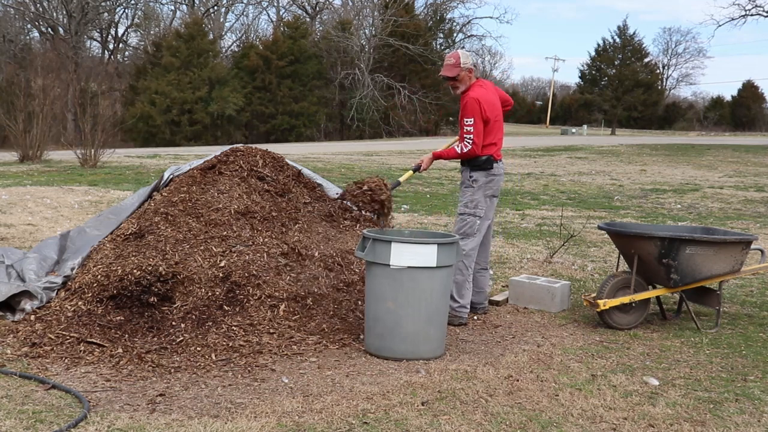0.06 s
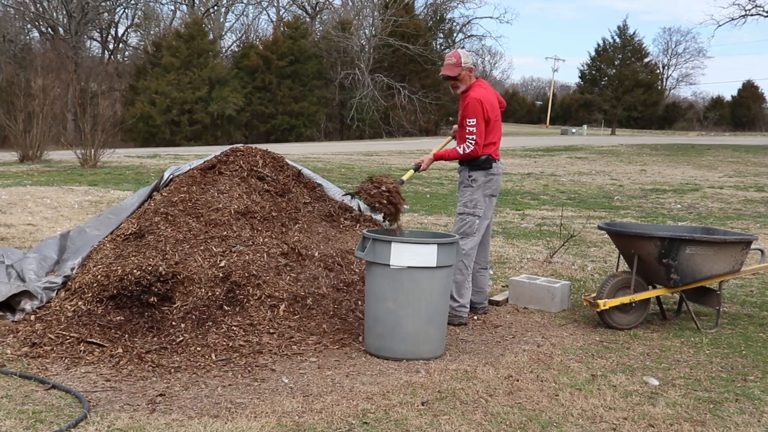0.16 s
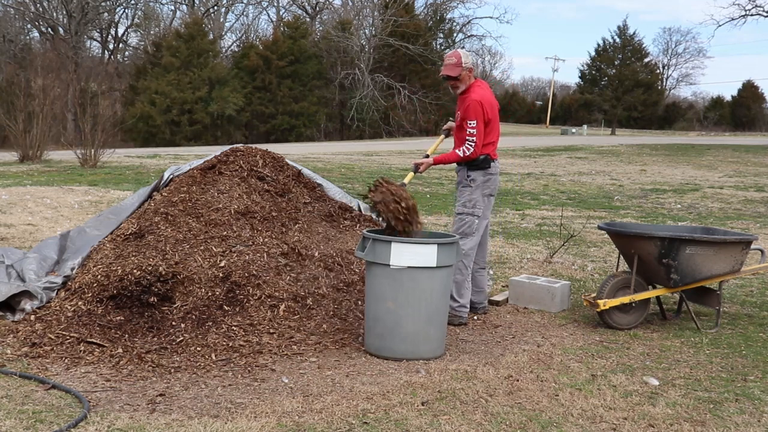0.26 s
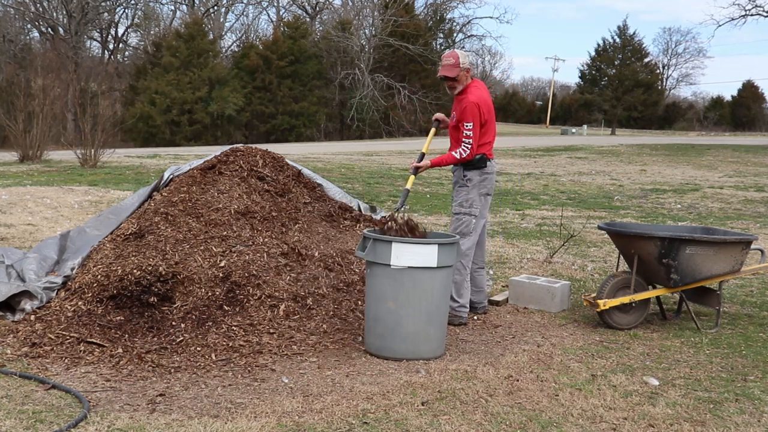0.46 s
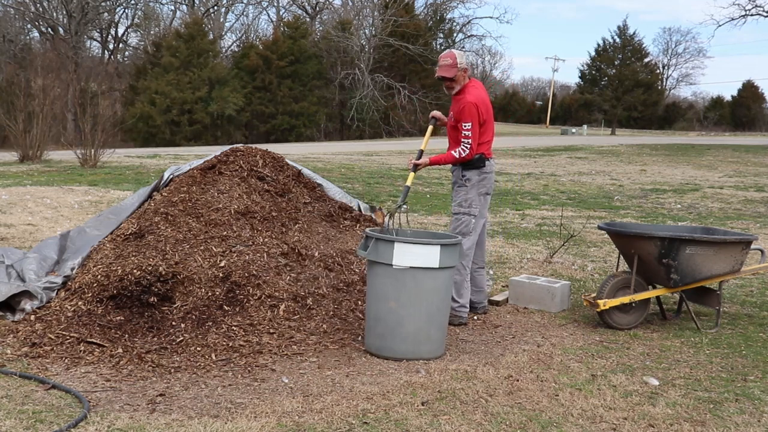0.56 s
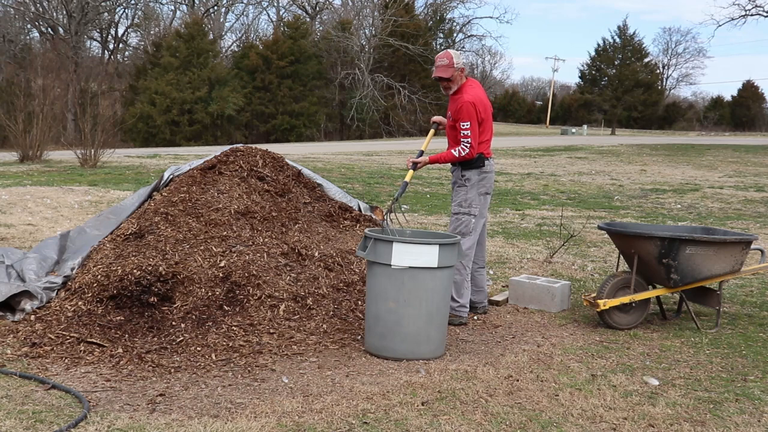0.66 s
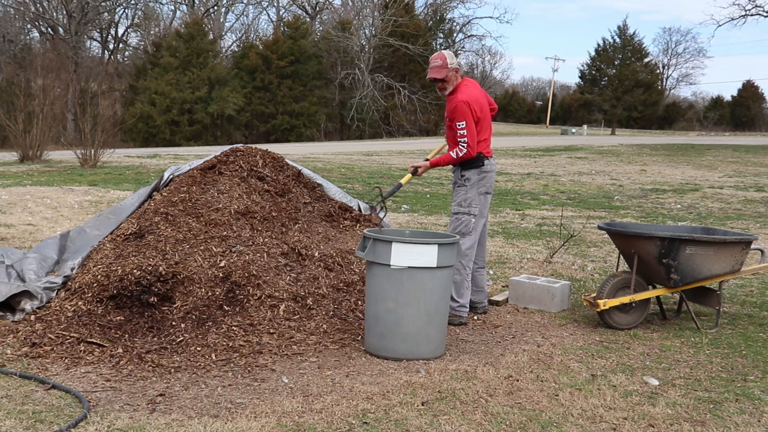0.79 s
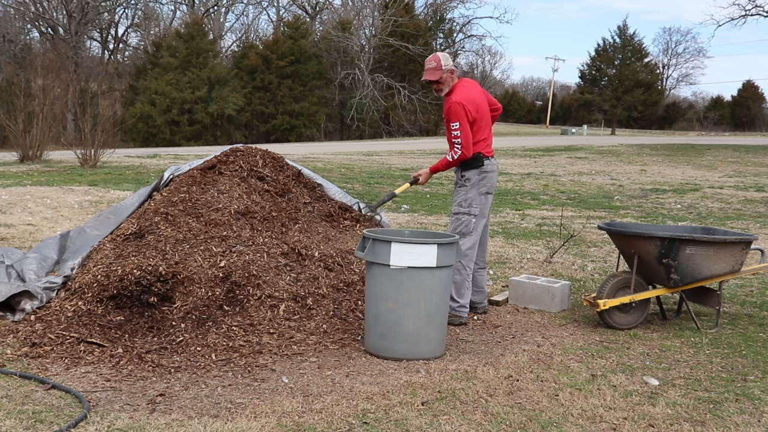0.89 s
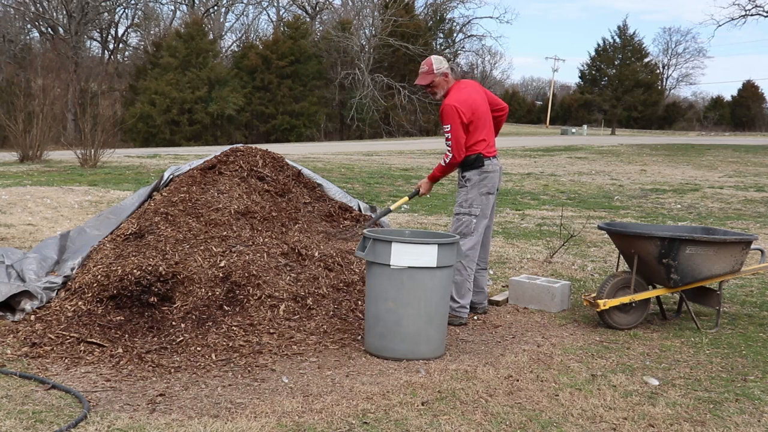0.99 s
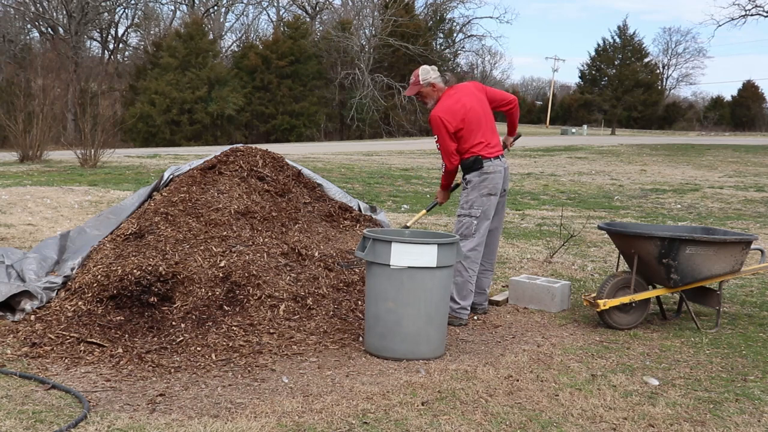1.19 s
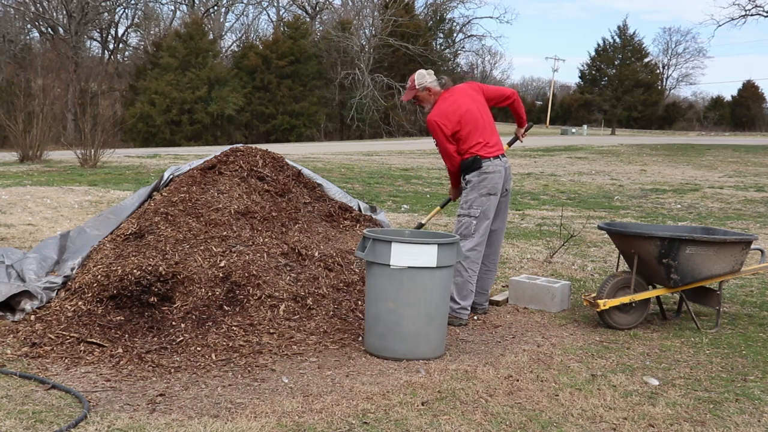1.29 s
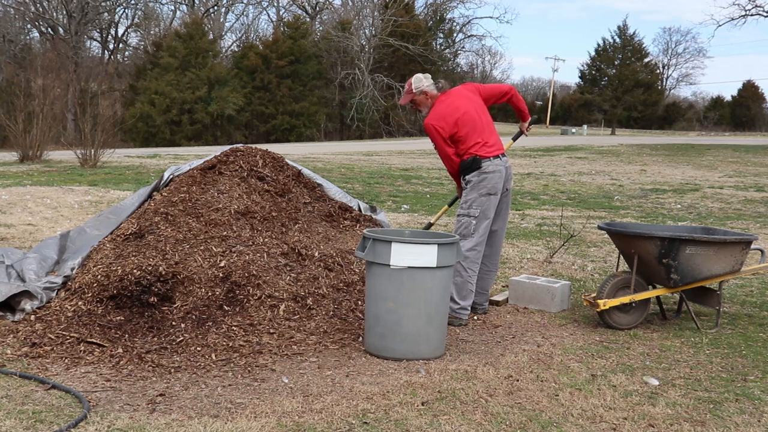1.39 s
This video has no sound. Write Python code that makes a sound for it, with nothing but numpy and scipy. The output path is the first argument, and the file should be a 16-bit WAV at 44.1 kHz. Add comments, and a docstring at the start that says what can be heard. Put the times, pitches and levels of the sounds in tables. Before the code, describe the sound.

Close up in the open air, a shovelful of wood chips trickles, then rushes into a large plastic bin that booms softly. A knock on the rim and last ticks follow, over light microphone wind, distant traffic and one far bird.

```python
"""A shovelful of wood chips slides off the blade and pours into a big plastic bin, close by, outdoors.
The chips patter and crackle in thousands of tiny impacts, clumps knock on the wall and the load booms
on the bottom. The blade clinks, the shovel bumps the rim and a few stragglers drop.
Behind it are one far bird call, distant traffic and light wind on the microphone."""
import sys
import numpy as np
from scipy import signal
from scipy.fft import rfft, irfft, next_fast_len
from scipy.io import wavfile
from scipy.ndimage import uniform_filter1d, map_coordinates

SR = 44100
rng = np.random.default_rng(int(sys.argv[2]) if len(sys.argv) > 2 else 0)


def master(y):
    """Save y as 16-bit WAV."""
    cut = np.clip(np.atleast_2d(y).T, -1, 1)
    pcm = np.round(cut * 32767)  # scale
    wavfile.write(sys.argv[1], SR, pcm.astype(np.int16))


N = 63945

# The tone of a hard, woody snap. Each row: frequency in Hz, level in dB.
SNAP_SPECTRUM = [(600, -27), (1300, 6), (3400, 0), (4000, -13.5), (5200, -12.5), (6500, -28), (9000, -33),
                 (15500, -45)]
# The tone of splinters and fine ticking. Each row: frequency in Hz, level in dB.
CRISP_SPECTRUM = [(800, -7), (2500, 2), (5000, -4), (8000, -13.5), (12000, -12), (15500, -18)]


def chip_stream():
    """Chips patter dully on the plastic, crackle against each other and hiss along the blade."""
    # The course of the pour. Each row: time in seconds, patter level in dB, crackle level in dB.
    pour_levels = [(.165, -47, -54.5), (.2, -31.5, -37), (.265, -31, -35.5), (.31, -42, -50.5),
                   (.39, -46, -49), (.44, -33, -45), (.5, -43, -38.5), (.528, -27, -36.5),
                   (.542, -24, -22.5), (.56, -24, -26), (.58, -28, -26.5), (.62, -24.5, -31.5),
                   (.68, -22.5, -29), (.715, -25.5, -35), (.76, -27, -33.5), (.8, -32, -41.5),
                   (.865, -34.5, -46), (.905, -52, -48.5), (.93, -23, -46.5), (.98, -39, -48.5),
                   (1.03, -47.5, -57), (1.16, -46, -61.5), (1.25, -58.5, -80)]
    # Fine chips sliding off the blade. Each row: time in seconds, level in dB.
    slide_levels = [(0, -62), (.17, -57.5), (.24, -53.5), (.31, -67), (.53, -56), (.539, -45.5), (.65, -44),
                    (.71, -53), (.8, -56), (.86, -76), (1.2, -85)]
    # Wood on plastic. Each row: frequency in Hz, level in dB.
    patter_spectrum = [(120, -58), (250, -9.5), (400, -8), (560, -1.5), (750, 0.5), (950, -3), (1100, -7.5),
                       (1500, -34.5), (2500, -37)]
    # Wood on wood. Each row: frequency in Hz, level in dB.
    crackle_spectrum = [(700, -36), (1250, 4), (1800, 1), (2300, -0.5), (3400, -2), (3900, -7.5),
                        (5000, -10.5), (6500, -23.5), (9000, -33), (15500, -54)]
    # Wood along steel. Each row: frequency in Hz, level in dB.
    hiss_spectrum = [(2000, -12), (5000, 9.5), (7000, -2), (10000, 0), (13000, -6), (15500, -10)]
    patter_db, crackle_db = curves(pour_levels)
    hiss_db, = curves(slide_levels)
    patter = grains(per_s=2200, low_hz=232, high_hz=1856, cycles=7.9, spread_db=2, samples=1200)
    crackle = grains(per_s=5000, low_hz=1050, high_hz=13700, cycles=8, spread_db=3.5, samples=400)
    hiss = grains(per_s=5000, low_hz=2000, high_hz=15500, cycles=8, spread_db=2.2, samples=200)
    return (amp(patter_db) * coloured(patter, patter_spectrum)
            + amp(crackle_db) * coloured(crackle, crackle_spectrum)
            + amp(hiss_db) * coloured(hiss, hiss_spectrum))


def clump_knocks():
    """Clumps hit the plastic wall, each with a short hollow ring over a dull thud."""
    # Each row: start in seconds, ring level in dB, pitch in Hz, ring T60 in seconds, thud level in dB.
    knocks = [(.194, -24, 870, 0.1, -19), (.2215, -15, 860, 0.018, -43), (.268, -19.5, 738, 0.035, -35),
              (.285, -18.5, 784, .02, -28.5), (.3415, -27, 710, 0.04, -22.5), (.412, -25, 480, 0.05, -29),
              (.457, -16, 874, 0.036, -21.5), (.5065, -10, 790, 0.022, -16), (.5085, 0, 960, 0.015, -12),
              (.512, -6, 1050, 0.012, -16), (.514, -15, 544, 0.055, -26), (.5405, -4.5, 919, 0.052, -13),
              (.5655, -.5, 880, 0.034, -17), (0.577, -7, 720, 0.024, -11), (.584, -12, 820, .02, -22),
              (.672, -17, 710, 0.029, -19), (.678, -18, 750, 0.025, -18), (.722, -13, 717, 0.02, -11),
              (.746, -9.5, 996, 0.046, -13), (.880, -27, 940, 0.055, -22), (.917, -6.5, 700, 0.013, -24),
              (.9235, -21, 570, 0.04, -20), (.932, -18, 440, 0.032, -21), (.9945, -18.5, 762, 0.03, -24.5),
              (1.088, -31.5, 750, 0.048, -33), (1.133, -7.5, 775, 0.024, -23),
              (1.146, -27.5, 570, 0.028, -54)]
    # The thud of the wall. Each row: frequency in Hz, level in dB.
    thud_spectrum = [(80, -35), (180, -13.5), (320, -3.5), (450, -4.5), (750, 2.5), (1050, -5.5),
                     (1400, -7), (2200, -21), (5000, -40.5), (10000, -94)]
    attack_s, overtone_ratio, overtone_db = 0.0014, 2.3, -11.5
    out, thud_noise = np.zeros(N), noise(thud_spectrum)
    for start, ring_db, hz, t60, thud_db in knocks:
        overtone = amp(overtone_db) * ring(hz * overtone_ratio, t60 / 2, attack_s)
        tone = ring(hz, t60, attack_s) + overtone
        thud = np.roll(thud_noise, -int(start * SR)) * fade(t60=0.025, attack_s=attack_s)
        add(out, start, amp(ring_db) * tone + amp(thud_db) * thud)
    return out


def chip_clicks():
    """A hard chip snaps and rings briefly; the higher its pitch, the thinner its snap."""
    # Single chips landing. Each row: start in seconds, level in dB, pitch in Hz, T60 in seconds.
    clicks = [(0.182, -27.5, 1780, 0.018), (0.194, -20.5, 1950, 0.018), (.342, -24.5, 1650, 0.011),
              (0.4115, -23, 2700, 0.024), (.431, -23, 2460, 0.018), (.457, -19, 2845, 0.021),
              (0.502, -18, 2560, 0.009), (0.54, -18, 2300, 0.013), (0.578, -15, 2400, 0.016),
              (.66, -20, 2600, .012), (.6705, -15, 1670, 0.013), (.679, -14, 1830, 0.024),
              (.681, -15.5, 3050, .012), (.7212, -14.5, 3000, 0.012), (.7232, -8.5, 1900, .011),
              (.7455, -16, 2100, .009), (0.7503, -16, 3210, 0.012), (.7538, -9, 2700, 0.009),
              (.765, -16, 2970, 0.011), (0.7728, -15, 2800, 0.0085), (.880, -26, 2920, 0.014),
              (0.916, -28, 2700, 0.035), (0.962, -17, 3070, 0.006), (.975, -23, 3000, 0.0037),
              (.984, -25.5, 2330, 0.0058), (0.9942, -26.5, 3100, 0.0088), (1.0765, -26.5, 3450, .011),
              (1.132, -32, 1910, 0.022)]
    snap_db, ring_db = -2.5, -9
    out, wood = np.zeros(N), noise(SNAP_SPECTRUM)
    for start, db, hz, t60 in clicks:
        snap = unit(high_pass(np.roll(wood, -int(start * SR)), 0.67 * hz, order=3))
        tone = np.sin(2 * np.pi * hz * clock())
        click = (amp(ring_db) * tone + amp(snap_db) * snap) * fade(t60, attack_s=0.0003)
        add(out, start, amp(db) * click)
    return out


def splinters():
    """Thin splinters snap crisply as the load shifts on the blade."""
    # Each row: start in seconds, level in dB.
    snaps = [(.020, -36.5), (0.068, -35.5), (.113, -38), (.139, -34), (0.16, -38), (0.233, -29.5),
             (.257, -31.5), (0.355, -38), (.502, -33), (.537, -30), (0.7205, -35), (0.9621, -44)]
    envelope = np.zeros(N)
    for start, db in snaps:
        add(envelope, start, amp(db) * fade(t60=0.015, attack_s=0.0003))
    return envelope * noise(CRISP_SPECTRUM)


def bin_boom():
    """The bin booms like a drum under each mass of chips and under the shovel's bump, and hums under the steady
    pour."""
    # The bin's low modes. Each row: frequency in Hz, level in dB, T60 in seconds.
    bin_modes = [(108.3, 0.5, 0.19), (130.4, -2, 0.12), (198, -4.5, 0.13), (286, -1, 0.064),
                 (352, -7.5, 0.094)]
    # Blows on the bin: masses of chips landing, and at 0.813 s the shovel's bump on the rim. Each row: start in
    # seconds, level in dB, pitch driven hardest in Hz.
    thumps = [(0.506, -13.5, 284), (.565, -19, 270), (.585, -22, 112), (.6625, -11.5, 107),
              (0.672, -7, 287), (0.729, -12, 134), (0.813, -23, 122), (.918, -17.5, 200)]
    # The hum of the bin. Each row: frequency in Hz, level in dB.
    hum_spectrum = [(70, -29.5), (95, -12), (112, 0), (150, -14), (290, -11.5), (420, -24), (1000, -60)]
    loss_db_per_octave, hum_db = 24, -29.5
    booms = np.zeros(N)
    for start, thump_db, centre_hz in thumps:
        driven_modes = [(hz, thump_db + db - loss_db_per_octave * abs(np.log2(hz / centre_hz)), t60)
                        for hz, db, t60 in bin_modes]
        add(booms, start, struck(driven_modes, attack_s=0.0014))
    pour = np.interp(clock(), [0.475, 0.58, 0.76, 0.865], [0, 1, 1, 0])
    hum = amp(hum_db) * pour * noise(hum_spectrum)
    return high_pass(booms + hum, hz=88, order=4)


def shovel():
    """The steel blade clinks once against a chip, then lands a dead, hard bump on the bin's rim."""
    # The blade's modes. Each row: frequency in Hz, level in dB, T60 in seconds.
    blade_modes = [(1830, -18, 0.017), (2730, -31, 0.023), (3620, -16, 0.017), (4100, -27.5, 0.018),
                   (4600, -16, 0.0067)]
    # The modes of the bumped rim. Each row: frequency in Hz, level in dB, T60 in seconds.
    rim_modes = [(194, -10, 0.032), (315, -11.5, 0.041), (508, -3, 0.014), (712, -4, 0.02), (986, -9, 0.04),
                 (1270, -5.5, 0.012), (1780, -6.5, 0.0075), (3150, -21, .005), (4630, -29, 0.011),
                 (6950, -46, .02)]
    clink_s, bump_s, bump_attack_s = 0.4753, 0.8133, 0.00041
    out = np.zeros(N)
    add(out, clink_s, struck(blade_modes, attack_s=0.0001))
    snap = amp(-11) * noise(SNAP_SPECTRUM) * fade(t60=0.0097, attack_s=bump_attack_s)
    add(out, bump_s, struck(rim_modes, bump_attack_s) + snap)
    return out


def with_echo(direct):
    """The direct sound and a short weak echo from bin, pile and ground."""
    tail = rng.standard_normal(N) * fade(t60=0.11, attack_s=0.0011)
    return direct + amp(-16) * signal.fftconvolve(direct, tail / np.linalg.norm(tail))[:N]


def far_bird():
    """One short, slightly falling nasal call from far off, dulling as it trails away."""
    # The call's harmonics, lowest first. Each entry: level in dB.
    harmonic_levels = [-33, -35, -51, -59]
    peak_s, rise_s, fall_s = 1.34, 0.0073, 0.018
    pitch_hz, sag_hz_per_s, roughness, dulling = 916, 500, 0.022, 0.3
    t = clock() - peak_s
    waver = unit(uniform_filter1d(rng.standard_normal(N), size=90))
    hz = (pitch_hz - sag_hz_per_s * t) * (1 + roughness * waver)
    phase = 2 * np.pi * np.cumsum(hz) / SR
    call = np.zeros(N)
    for k, db in enumerate(harmonic_levels):
        envelope = np.exp(np.minimum(t / rise_s, -t * (1 + dulling * k) / fall_s))
        call += amp(db) * np.sin((k + 1) * phase) * envelope
    return call


def microphone_wind():
    """Light gusts buffet the microphone with an uneven rumble."""
    # The course of the gusts. Each row: time in seconds, level in dB.
    gust_levels = [(0, -48), (.2, -48), (.33, -38.5), (.45, -36), (.58, -46), (.67, -36), (.77, -36),
                   (.92, -45), (1.13, -60), (1.22, -39.5), (1.3, -67)]
    # The rumble. Each row: frequency in Hz, level in dB.
    wind_spectrum = [(10, -1.5), (30, 11), (45, -2), (70, -7.5), (150, -44)]
    buffets_per_s, buffet_db = 16.6, 4.5
    gust_db, = curves(gust_levels)
    buffet = map_coordinates(rng.standard_normal(N), [clock() * buffets_per_s])
    return amp(gust_db + buffet_db * buffet) * noise(wind_spectrum)


def faint_ticking():
    """Fine, crisp ticking in the background that dies away."""
    start_db, fall_db_per_s = -50, 13
    ticks = grains(per_s=1800, low_hz=1740, high_hz=14600, cycles=7, spread_db=3.3, samples=150)
    return amp(start_db - fall_db_per_s * clock()) * coloured(ticks, CRISP_SPECTRUM)


def distant_traffic():
    """Traffic, blurred by distance into a steady wash."""
    # Each row: frequency in Hz, level in dB.
    traffic_spectrum = [(40, -3), (70, -7.5), (170, -2.5), (300, -7), (450, -11.5), (700, -12), (880, -1.5),
                        (1100, -8), (1600, -20.5), (2100, -21.5), (3200, -29.5), (5000, -33.5),
                        (11800, -34), (15500, -37)]
    return amp(-44.5) * noise(traffic_spectrum)


def amp(db):
    return 10 ** (np.asarray(db) / 20)


def unit(x):
    return x / np.sqrt(np.mean(x ** 2) + 1e-20)


def clock():
    return np.arange(N) / SR


def curves(rows):
    """One value per sample for each column after the time."""
    times, *columns = np.transpose(rows)
    return [np.interp(clock(), times, column) for column in columns]


def coloured(x, spectrum):
    """x through a causal filter with the (Hz, dB) shape, at rms 1."""
    size = 2 * next_fast_len(N)
    hz, db = np.transpose(spectrum)
    gain_db = np.interp(np.log(np.fft.rfftfreq(size, 1 / SR) + 1), np.log(hz), db)
    cepstrum = irfft(np.log(amp(gain_db)))
    # Minimum phase: nothing rings ahead of an impact.
    cepstrum[1:size // 2] *= 2
    cepstrum[size // 2 + 1:] = 0
    response = np.exp(rfft(cepstrum))
    return unit(irfft(rfft(x, size) * response)[:N])


def noise(spectrum):
    return coloured(rng.standard_normal(N), spectrum)


def high_pass(x, hz, order):
    return signal.sosfilt(signal.butter(order, hz, "high", fs=SR, output="sos"), x)


def fade(t60, attack_s):
    """A quick rise and a decay of 60 dB in t60 seconds."""
    return np.exp(-np.log(1000) * clock() / t60) * (1 - np.exp(-clock() / attack_s))


def ring(hz, t60, attack_s):
    return np.sin(2 * np.pi * hz * clock()) * fade(t60, attack_s)


def struck(modes, attack_s):
    """The sum of (Hz, dB, T60) modes, neighbours swinging opposite ways."""
    return sum((-1) ** k * amp(db) * ring(hz, t60, attack_s) for k, (hz, db, t60) in enumerate(modes))


def add(out, start_s, x):
    """Mix x into out from start_s on."""
    first = int(start_s * SR)
    out[first:] += x[:N - first]


def grains(per_s, low_hz, high_hz, cycles, spread_db, samples):
    """Tiny random impacts, each a sine that falls 60 dB over the given cycles."""
    when, pitch, strength, sign = rng.random((int(per_s * N / SR), 4)).T
    hz = (low_hz * (high_hz / low_hz) ** pitch)[:, None]
    turns = hz * np.arange(samples) / SR
    gain = amp(-spread_db * np.log(1 - 0.985 * strength)) * np.sign(sign - 0.5)
    decay = np.exp(-np.log(1000) * turns / cycles)
    waves = gain[:, None] * hz * np.sin(2 * np.pi * turns) * decay  # scaling by hz evens the spectrum
    positions = (when * N).astype(int)[:, None] + np.arange(samples)
    return np.bincount(positions.ravel(), waves.ravel(), N)[:N]


def scene():
    """Chips, shovel and bin up close, the open air behind them, in mono."""
    chips = chip_stream() + clump_knocks() + chip_clicks() + splinters()
    chips = high_pass(chips, hz=129, order=2)  # small bodies radiate no deep bass
    foreground = with_echo(chips + shovel()) + bin_boom()
    background = far_bird() + microphone_wind() + faint_ticking() + distant_traffic()
    return (foreground + background)[None]


def record(dry):
    """The recorder rounds off the highest peaks and keeps nothing above its band limit."""
    ceiling, top_hz = 0.88, 15950
    size = 2 * next_fast_len(N)
    rounded = dry / (1 + (dry / ceiling) ** 6) ** (1 / 6)
    in_band = np.fft.rfftfreq(size, 1 / SR) < top_hz
    return irfft(rfft(rounded, size) * in_band, size)[:, :N]


dry = scene()
out = record(dry)
master(out)
```